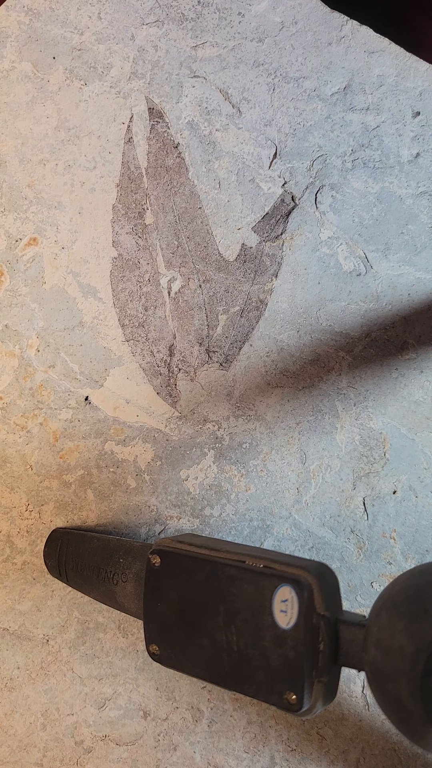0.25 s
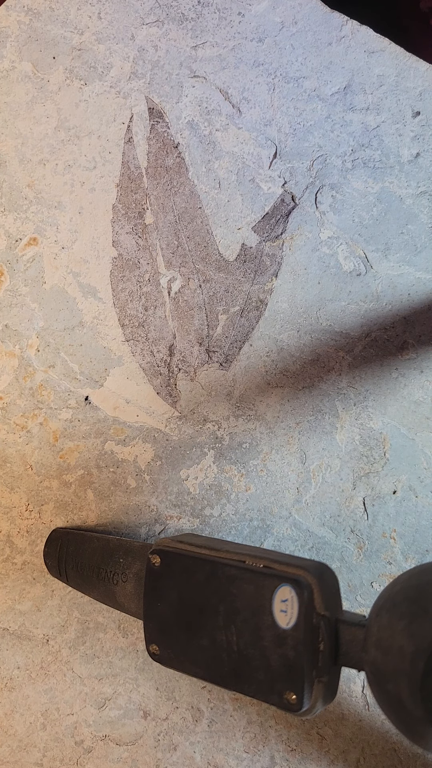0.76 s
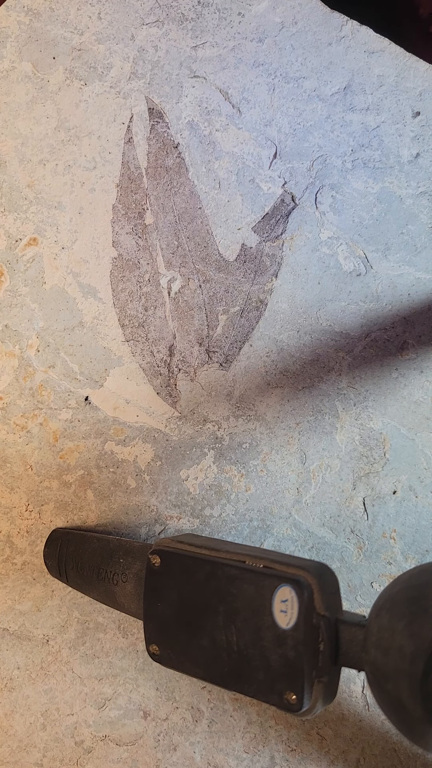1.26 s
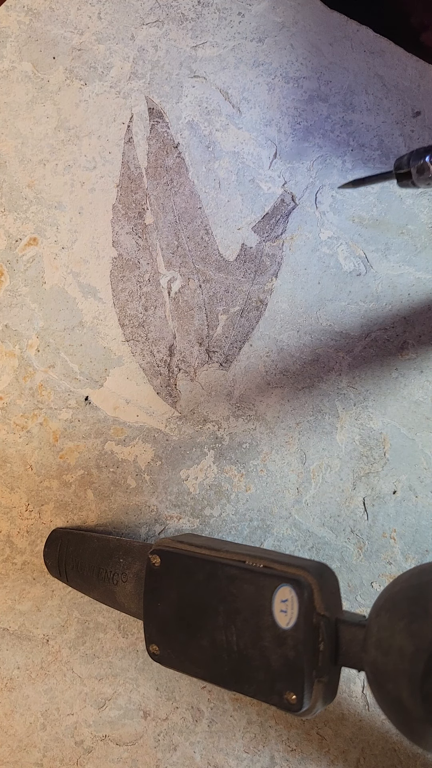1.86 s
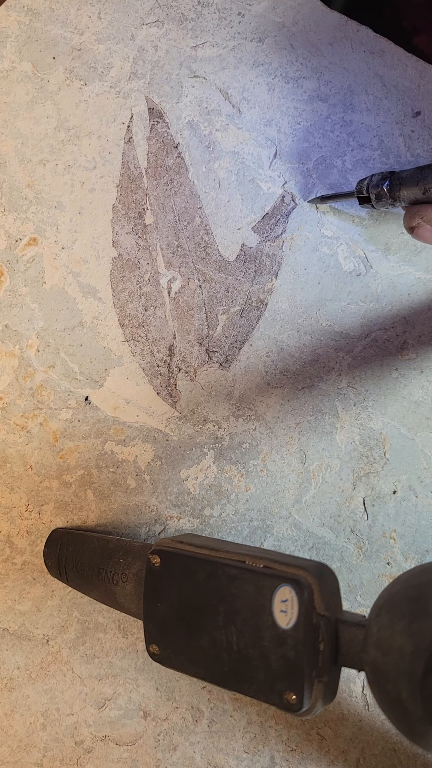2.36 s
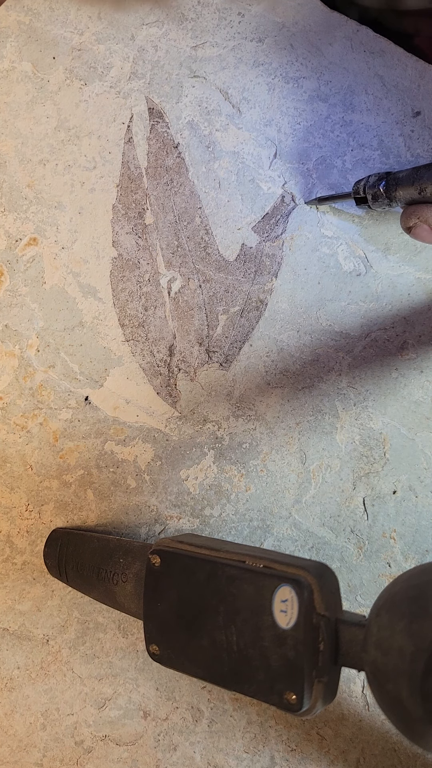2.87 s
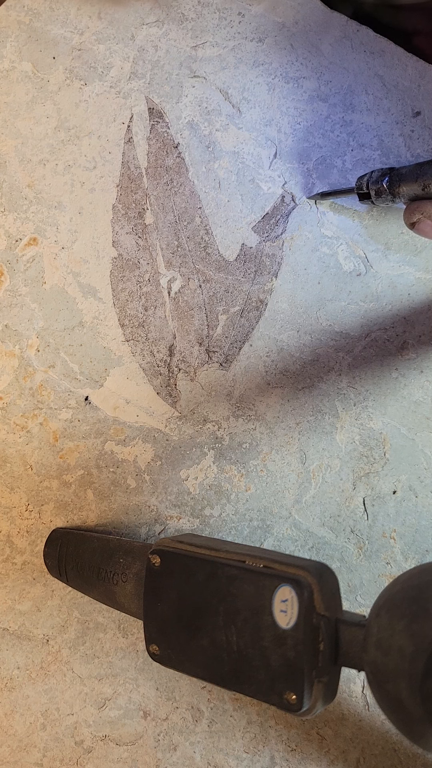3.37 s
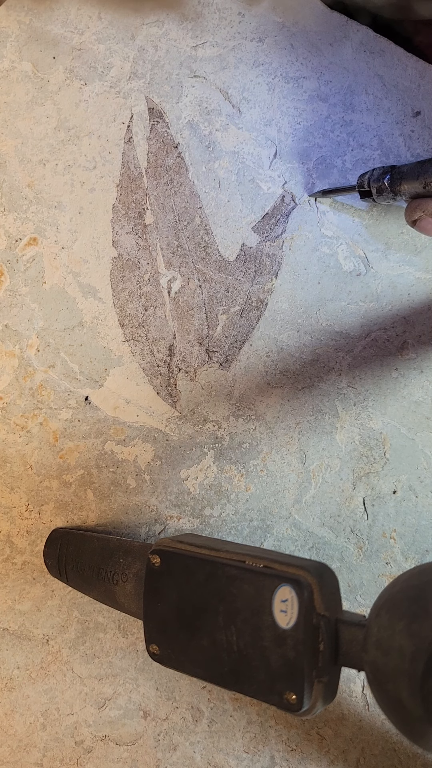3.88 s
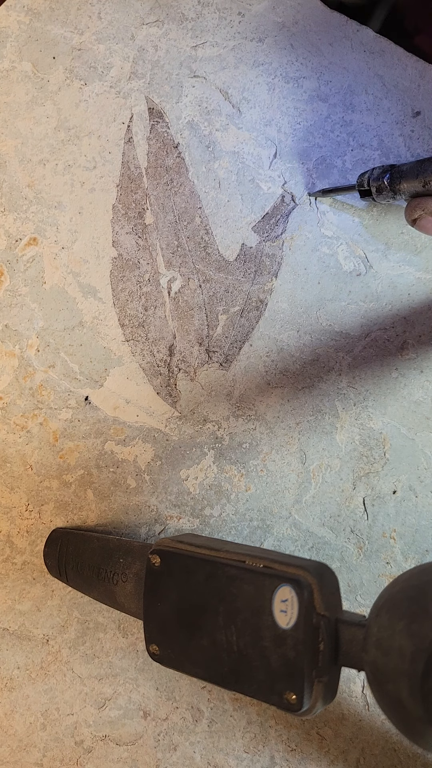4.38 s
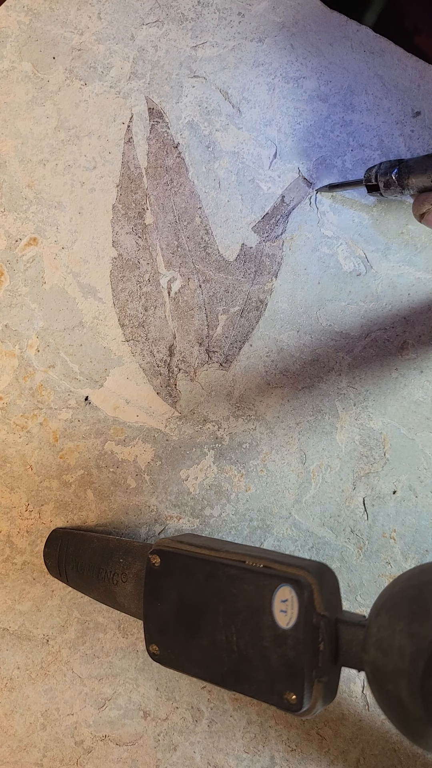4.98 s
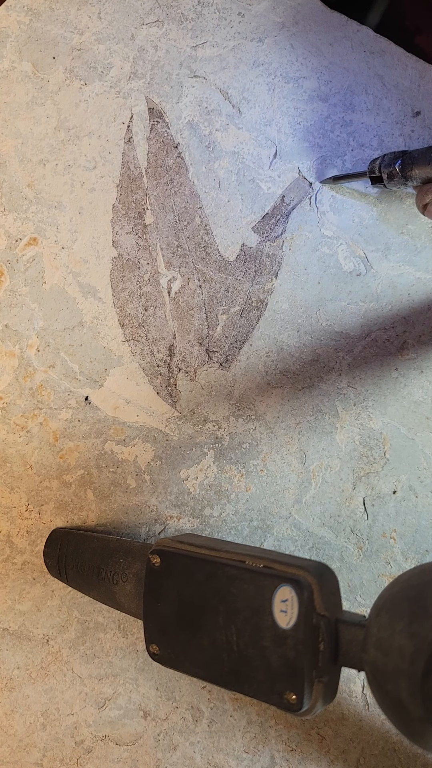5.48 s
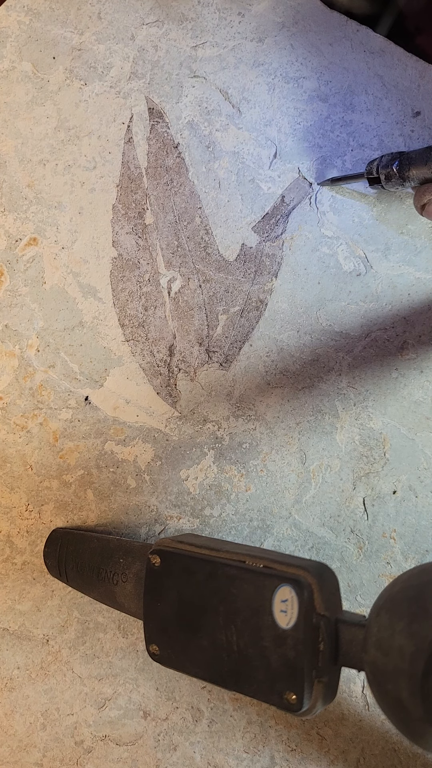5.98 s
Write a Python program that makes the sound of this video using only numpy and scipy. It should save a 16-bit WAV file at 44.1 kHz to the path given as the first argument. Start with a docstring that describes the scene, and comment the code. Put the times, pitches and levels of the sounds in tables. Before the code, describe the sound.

Small air-driven scribe buzzes softly, leaps in pitch within a moment, then drones on steadily with harsh compressed-air hiss over stone.

```python
"""Pneumatic scribe on a stone slab

A scribe idles in a quiet workshop; its valve opens and the piston races up to full speed.
The hand swings it past two spaced microphones and lowers it onto the slab. The buzz is a sum of stroke
overtones; the exhaust is shaped noise puffing once a stroke. Low rumble, tones and soft bumps lie behind."""
import sys
import numpy as np
from scipy import signal
from scipy.fft import rfft, irfft, next_fast_len
from scipy.io import wavfile
from scipy.ndimage import uniform_filter1d, map_coordinates

SR = 44100
rng = np.random.default_rng(int(sys.argv[2]) if len(sys.argv) > 2 else 0)


def store_wav(level_fs):
    """Save 16-bit WAV to argv[1]."""
    pcm = np.round(np.clip(np.atleast_2d(level_fs), -1, 1) * 32767)
    wavfile.write(sys.argv[1], SR, pcm.T.astype(np.int16))


N = 275184
TIME = np.arange(N) / SR

# changes from one hold of the tool to the next: start_s, end_s
MOVES = [(.63, .68), (.7, .76), (.93, 1.0), (1.33, 1.42), (1.76, 1.9), (5.62, 5.76)]


def amp(db):
    """Gain of a level in dB."""
    return 10 ** (np.asarray(db) / 20)


def unit(x):
    """Scaled to rms 1."""
    return x / np.sqrt(np.mean(x ** 2))


def along(points, hz):
    """(Hz, value) points interpolated on a log frequency axis."""
    point_hz, value = np.transpose(points)
    return np.interp(np.log(hz + 1), np.log(point_hz + 1), value)


def curves(rows):
    """One value per sample for each column after the time."""
    s, *columns = np.transpose(rows)
    return [np.interp(TIME, s, column) for column in columns]


def wobble(knots_per_s):
    """A smooth random curve through normally distributed knots."""
    coarse_s = TIME[::16]
    knots = rng.standard_normal(int(N * knots_per_s / SR) + 4)
    return np.interp(TIME, coarse_s, map_coordinates(knots, [coarse_s * knots_per_s]))


def filtered(x, response):
    """x with its spectrum multiplied by a response of frequency."""
    m = next_fast_len(N + SR // 2)
    return irfft(rfft(x, m) * response(np.fft.rfftfreq(m, 1 / SR)), m)[..., :N]


def bands(hz, table):
    """Gain of narrow lifts or dips given as (centre Hz, width Hz, dB)."""
    return amp(sum(db / (1 + (2 * (hz - centre_hz) / width_hz) ** 2) for centre_hz, width_hz, db in table))


def pair(alike):
    """Two partly alike white noises, with small time-frequency patches of chance gain."""
    spectra = signal.stft(rng.standard_normal((2, N)), nperseg=512)[2]
    patches = uniform_filter1d(rng.standard_normal(spectra.shape[1:]), size=4, axis=0)
    patches = uniform_filter1d(patches, size=8, axis=1)
    a, b = signal.istft(spectra * amp(1.4 * unit(patches)), nperseg=512)[1][:, :N]
    turn = np.arccos(np.clip(alike, -1, 1)) / 2
    common, differing = np.cos(turn) * a, np.sin(turn) * b
    return np.array([common + differing, common - differing])


def piston():
    """Phase of the stroke cycle: the rate races from idle to full speed, stumbling, and stays unsteady."""
    # full speed, pulled about by the hand and the load on the tip: time_s, strokes_per_s
    full_speed = [(.76, 252), (.95, 252.6), (.99, 249.9), (1.28, 251), (1.38, 249.4), (1.44, 251.4),
                  (1.52, 247.6), (1.78, 251.6), (1.815, 253), (1.843, 259), (1.865, 252.5), (2.1, 251.8),
                  (3.4, 251.6), (4.0, 250.3), (4.76, 250.5), (4.9, 248.6), (4.98, 251.4), (5.44, 250.4),
                  (5.64, 251.7), (5.76, 248.8), (6.24, 249.3)]
    idle_hz, race_middle_s = 157.5, .677
    spin_up_s, settle_s = .016, .021  # time constants before and after the middle
    jitter, stumble = 0.0026, 0.007  # shares of the rate; stumble acts during the race

    full_hz, = curves(full_speed)
    time_constant_s = np.where(TIME < race_middle_s, spin_up_s, settle_s)
    opened = 1 / (1 + np.exp((race_middle_s - TIME) / time_constant_s))
    racing = 4 * opened * (1 - opened)
    unsteady = 0.001525 * wobble(25) + (jitter + stumble * racing) * wobble(120)
    stroke_hz = (idle_hz + (full_hz - idle_hz) * opened) * (1 + unsteady)
    return 2 * np.pi * np.cumsum(stroke_hz) / SR


def buzz(cycle):
    """Stroke overtones; each hold of the tool radiates them differently to the two sides."""
    # overtones of each hold: multiple, left_db, right_db, left_lead_rad
    idling = [(1, -36.0, -36.0, 1.0), (2, -30.0, -36.0, 0.4), (3, -29.0, -34.0, 2.3),
              (4, -29.0, -48.0, 1.9), (5, -38.0, -41.0, -1.7), (6, -34.0, -52.0, -2.2),
              (7, -42.0, -45.0, -2.6), (8, -36.0, -40.0, 2.1), (9, -37.0, -36.0, -3.0),
              (10, -45.0, -49.0, 2.3), (11, -42.0, -42.0, 2.9), (12, -40.0, -38.0, -2.6),
              (13, -38.0, -42.0, -1.5), (14, -46.0, -51.0, -1.5), (15, -69.0, -66.0, -2.3),
              (16, -49.0, -46.0, 0.0), (17, -45.0, -48.0, 0.9), (18, -50.0, -54.0, -0.3),
              (19, -52.0, -56.0, 2.4), (20, -46.0, -54.0, -0.8), (21, -44.0, -51.0, 1.8),
              (22, -42.0, -51.0, 1.7), (23, -48.0, -55.0, 2.7), (24, -52.0, -53.0, 3.0),
              (25, -49.0, -53.0, 0.1), (26, -49.0, -51.0, 2.9), (27, -52.0, -51.0, -2.8),
              (28, -53.0, -60.0, -2.8), (29, -54.0, -55.0, -2.1), (30, -52.0, -50.0, -2.6),
              (31, -52.0, -54.0, -2.8), (32, -50.0, -54.0, -0.9), (33, -54.0, -59.0, -0.9),
              (34, -54.0, -56.0, -0.7), (35, -52.0, -60.0, 0.3), (36, -55.0, -61.0, -1.8),
              (37, -52.0, -60.0, -0.3), (38, -52.0, -59.0, 0.0), (39, -55.0, -62.0, -2.3),
              (40, -54.0, -57.0, 1.4), (41, -56.0, -68.0, 2.0), (42, -54.0, -62.0, 1.1),
              (43, -56.0, -61.0, -1.4), (44, -54.0, -58.0, -1.8)]
    racing = [(1, -26, -36, 4), (2, -19, -26, 4), (3, -27, -33, 3), (4, -32, -32.5, 2), (5, -43, -61, -2.5),
              (6, -51, -37, 6), (7, -41, -32, -4), (8, -31, -34, 5), (9, -40, -35, -10.5)]
    lifted = [(1, -18.0, -29.0, -0.0), (2, -21.0, -24.0, 2.8), (3, -44.0, -26.0, -2.4),
              (4, -37.0, -27.0, -2.9), (5, -34.0, -36.0, 3.1), (6, -35.0, -34.0, -0.6),
              (7, -34.0, -24.0, -1.9), (8, -57.0, -32.0, 0.2), (9, -45.0, -46.0, -0.5),
              (10, -43.0, -53.0, -1.0), (11, -37.0, -42.0, -1.4), (12, -37.0, -33.0, 1.2),
              (13, -36.0, -37.0, -0.4), (14, -43.0, -43.0, 1.1), (15, -36.0, -36.0, 2.3),
              (16, -37.0, -42.0, 1.2), (17, -44.0, -44.0, -1.5), (18, -45.0, -47.0, 3.0),
              (19, -50.0, -60.0, -2.8), (20, -44.0, -44.0, -1.6), (21, -43.0, -50.0, 0.1),
              (22, -47.0, -52.0, -0.3), (23, -41.0, -45.0, 0.2), (24, -46.0, -45.0, 0.1)]
    swung = [(1, -20.0, -30.0, -0.2), (2, -26.0, -24.0, 2.5), (3, -31.0, -36.0, 2.3),
             (4, -30.0, -37.0, 1.6), (5, -41.0, -43.0, 2.6), (6, -37.0, -38.0, 2.0),
             (7, -31.0, -32.0, -2.8), (8, -27.0, -26.0, -2.5), (9, -39.0, -40.0, -2.0),
             (10, -56.0, -40.0, -1.7), (11, -31.0, -34.0, 2.7), (12, -30.0, -35.0, -0.7),
             (13, -40.0, -39.0, -2.0), (14, -40.0, -49.0, -0.2), (15, -38.0, -37.0, 1.1),
             (16, -39.0, -44.0, -1.8), (17, -45.0, -56.0, 0.3), (18, -57.0, -59.0, -2.9),
             (19, -57.0, -55.0, 2.5), (20, -47.0, -48.0, -2.4), (21, -47.0, -48.0, -1.4),
             (22, -54.0, -57.0, -0.8), (23, -53.0, -56.0, -0.1), (24, -54.0, -58.0, 0.1)]
    lowered = [(1, -19.0, -26.0, 0.6), (2, -27.0, -24.0, 1.9), (3, -25.0, -26.0, 0.7),
               (4, -18.0, -22.0, 2.4), (5, -33.0, -38.0, 3.0), (6, -36.0, -35.0, -2.6),
               (7, -31.0, -40.0, 2.2), (8, -41.0, -49.0, -2.7), (9, -44.0, -45.0, 3.0),
               (10, -51.0, -50.0, -1.9), (11, -38.0, -39.0, -3.0), (12, -37.0, -37.0, -3.1),
               (13, -40.0, -40.0, -2.4), (14, -49.0, -48.0, 0.4), (15, -44.0, -44.0, -0.5),
               (16, -39.0, -39.0, -0.2), (17, -46.0, -48.0, -0.1), (18, -53.0, -51.0, 0.2),
               (19, -47.0, -55.0, 2.2), (20, -48.0, -55.0, -2.2), (21, -44.0, -49.0, 0.4),
               (22, -47.0, -50.0, 1.4), (23, -58.0, -56.0, 2.6), (24, -60.0, -62.0, -0.5),
               (25, -57.0, -62.0, -3.0), (26, -55.0, -59.0, -1.3)]
    working = [(1, -21.0, -28.0, 0.6), (2, -27.0, -26.0, 1.8), (3, -25.0, -26.0, 0.8),
               (4, -18.0, -26.0, 2.4), (5, -30.0, -42.0, 2.1), (6, -33.0, -39.0, -1.8),
               (7, -26.0, -31.0, 2.6), (8, -36.0, -42.0, -2.6), (9, -43.0, -45.0, -2.3),
               (10, -50.0, -50.0, -3.1), (11, -45.0, -43.0, -2.1), (12, -41.0, -38.0, -2.1),
               (13, -46.0, -37.0, -1.7), (14, -43.0, -47.0, -2.9), (15, -48.0, -44.0, -3.1),
               (16, -52.0, -41.0, -1.8), (17, -43.0, -42.0, -1.4), (18, -50.0, -48.0, -0.3),
               (19, -47.0, -49.0, 0.2), (20, -47.0, -49.0, 0.5), (21, -48.0, -54.0, 1.2),
               (22, -45.0, -55.0, 1.8), (23, -47.0, -55.0, 1.9), (24, -53.0, -55.0, -3.1),
               (25, -48.0, -54.0, -1.4), (26, -52.0, -52.0, -2.4), (27, -58.0, -52.0, 3.1),
               (28, -45.0, -60.0, 2.8), (29, -48.0, -51.0, -1.6), (30, -51.0, -59.0, 1.6)]
    tilted = [(1, -22.0, -30.0, 0.8), (2, -27.0, -26.0, 1.7), (3, -26.0, -27.0, 0.5),
              (4, -18.0, -25.0, 2.6), (5, -27.0, -36.0, 0.1), (6, -31.0, -30.0, -2.0),
              (7, -26.0, -32.0, 2.6), (8, -37.0, -33.0, -2.9), (9, -41.0, -41.0, -3.1),
              (10, -48.0, -48.0, -3.0), (11, -44.0, -43.0, 0.2), (12, -39.0, -39.0, 3.1),
              (13, -43.0, -42.0, -1.7), (14, -39.0, -42.0, -2.5), (15, -47.0, -43.0, -2.5),
              (16, -42.0, -34.0, -0.3), (17, -36.0, -35.0, -1.7), (18, -60.0, -40.0, -1.4),
              (19, -50.0, -41.0, -2.1), (20, -43.0, -40.0, 1.0), (21, -47.0, -47.0, 2.4),
              (22, -35.0, -45.0, 1.8), (23, -38.0, -48.0, 1.2), (24, -46.0, -47.0, -1.8),
              (25, -41.0, -42.0, -2.1), (26, -47.0, -47.0, -3.0), (27, -44.0, -46.0, 3.1),
              (28, -35.0, -45.0, -3.0), (29, -41.0, -49.0, -2.4), (30, -42.0, -57.0, -0.1)]
    # fifth overtone swells and dulls during the work: time_s, gain_db
    fifth = [(2.4, -1.5), (4.2, 3), (4.9, 0.5), (5.2, -8)]
    # overtones of a puff do not peak together: rad_per_multiple_squared, rad_per_multiple, rad
    slow_puff, fast_puff = (-1.0, 1.42, -.36), (.22, -.16, -.36)
    rasp_top, rasp_db, rasp_scatter_db = 63, (-53, -60), 2.5  # top multiple, left and right dB
    uneven_db, uneven_per_s = 0.82, 36
    swing_wander_db, swing_wander_per_s = 3, 9.18

    moved = [np.ones(N)] + [np.interp(TIME, move, [0, 1]) for move in MOVES] + [np.zeros(N)]
    # the idling ladder goes on faintly
    rasp = [(k, *rng.normal(rasp_db, rasp_scatter_db), rng.uniform(-np.pi, np.pi))
            for k in range(len(idling) + 1, rasp_top + 1)]
    holds = (idling + rasp, racing, lifted, swung, lowered, working, tilted)
    swinging, at_work = moved[2] - moved[4], moved[5] - moved[6]
    uneven = amp(uneven_db * wobble(uneven_per_s))  # harder and softer strokes, in quick runs
    out = np.zeros((2, N))
    for k in range(1, max(map(len, holds)) + 1):
        gain, leading = np.zeros((2, N)), np.zeros(N)
        for hold, comes, goes in zip(holds, moved, moved[1:]):
            if k <= len(hold):
                _, left_db, right_db, lead_rad = hold[k - 1]
                gain += np.outer(amp([left_db, right_db]), comes - goes)
                leading += lead_rad * (comes - goes)
        if k == 5:
            gain *= amp(curves(fifth)[0] * at_work)
        if k > 1:
            gain *= uneven
        # random wavering of strength and phase, greater in higher overtones
        drift_db = (.1 + .002 * min(k, 24) ** 2) * wobble(2.5)
        drift_db += swing_wander_db * min(k / 6, 1) * swinging * wobble(swing_wander_per_s)
        level_waver = [amp(drift_db + (0.13 + 0.15 * min(k, 24)) * wobble(30)) for side in range(2)]
        phase_waver = [0.041 * min(k, 30) * wobble(22) for side in range(2)]
        slow, fast = (np.polyval(puff, k) % (2 * np.pi) for puff in (slow_puff, fast_puff))
        spread = slow + (fast - slow) * moved[1]
        phase = k * cycle + spread + phase_waver + np.outer([.5, -.5], leading)
        out += gain * level_waver * np.cos(phase)
    return np.sqrt(2) * out  # table levels are rms


def exhaust(cycle):
    """Turbulent air in four ranges, pulsing once a stroke, most ranges deeper on the left."""
    # open exhaust while the vent swings, then on the slab: time_s, jet_db, hiss_db, flutter_db, whoosh_db
    open_air = [(.7, -16.5, -27.5, -25, -35.5), (.85, -18, -33, -29, -46), (.92, -17, -39, -32, -46),
                (.97, -13, -31, -29, -43), (1.0, -21, -34, -26.5, -36), (1.09, -22.5, -32, -29.5, -35),
                (1.14, -18.5, -32.5, -26, -44), (1.24, -18.5, -27.5, -25, -47), (1.33, -18, -34, -34, -37),
                (1.38, -18, -29, -25, -43), (1.44, -19, -32.5, -32, -33.5), (1.48, -18, -32, -33, -36),
                (1.54, -17.5, -31.5, -32, -46), (1.62, -17, -29, -43, -38), (1.8, -20, -33, -40, -45),
                (2.1, -20, -32.5, -36, -46), (5.62, -20, -31, -36.5, -44), (5.76, -20.5, -32, -41, -46.5)]
    # valve nearly shut: jet_db, hiss_db, flutter_db, whoosh_db
    idle_air = (-28, -40.5, -43, -51.5)
    # flow rises to full before the piston does: start_s, end_s
    air_opens = (0.638, 0.685)
    # spectrum shapes: freq_hz, relative_density_db
    jet = [(5590, -35), (9500, -5), (10800, -5), (12100, 1), (13100, 4), (14300, 2.5), (15100, 5.5),
           (15700, -4.5)]
    hiss = [(2240, -46), (3800, -6.5), (4470, -4), (5280, -3), (6300, -2.5), (6750, -1), (7300, 1),
            (8300, -2), (9290, -10.5), (10800, -23), (11500, -17), (15000, -55), (22000, -120)]
    flutter = [(1100, -17), (1600, -7.5), (2000, 0.5), (2500, -2.5), (3000, -1), (3400, 2.5), (4000, -6),
               (5000, -9.5), (6200, 1.5), (7500, -15)]
    whoosh = [(110, -35), (160, -13), (250, 9.5), (400, -6), (620, -8.5), (900, -3), (1300, 1),
              (1700, -5.5), (2300, -24), (3000, -48)]
    # steady whistling bands of the vent: centre_hz, width_hz, lift_db
    nozzle = [(7430, 300, 4), (12300, 150, 5), (13750, 250, 3), (14300, 200, 3), (14700, 250, 4),
              (15330, 300, 5)]
    # difference between the sides: freq_hz, left_minus_right_db
    sides = [(140, 3), (330, 8), (600, 20), (1170, 6), (1790, 3), (2740, -4.5), (4190, -2), (6410, 2),
             (8300, -1), (9810, 1.5), (12300, -7), (15000, -7.5)]
    # left minus right on top of that: idling_db, swinging_db, working_db
    vent_pan = (2.5, 3, 2.6)
    # stroke puff, rows idling, swinging, working: depth_factor, delay_rad, sharpness_0_to_1
    puff_shapes = [(1.2, 0.89, 0.7), (0.66, 1.6, .2), (0.93, 0.24, 0.36)]
    # colour with the valve nearly shut: freq_hz, gain_db
    trickle = [(1500, 1), (2450, 3.5), (3300, 1), (4400, -6), (6000, -1), (7800, 0), (10000, -1),
               (15000, 0.5)]
    # narrow dips in the air noise while working: centre_hz, width_hz, gain_db
    dips = [(2180, 160, -14), (2530, 88, -19), (2430, 130, -16.5), (3600, 110, -15)]

    def by_use(values):
        """Glide from the idling to the swinging to the working value."""
        return np.interp(TIME, [*MOVES[0], *MOVES[3]], np.repeat(values, [1, 2, 1]))

    def paths(hz, lag_ms):
        """Level difference of the sides and lag of the right one."""
        lag = np.exp(np.outer([0, -2j * np.pi * lag_ms / 1000], hz))
        return amp(np.outer([.5, -.5], along(sides, hz))) * lag

    flow = np.interp(TIME, air_opens, [0, 1])
    levels_db = [idle + (full - idle) * flow for idle, full in zip(idle_air, curves(open_air))]
    depth, delay, sharp = (by_use(column) for column in np.transpose(puff_shapes))
    pulse = depth * (np.cos(cycle - delay) + sharp * np.cos(2 * (cycle - delay)))
    # spectrum, left and right dB per unit of pulse, left-right likeness, lag_ms
    ranges = [(jet, [[2.7], [1.3]], .4, .267), (hiss, [[2.6], [.8]], .4, .235),
              (flutter, [[2.2], [1.2]], .4, .235), (whoosh, [[1.2], [1.3]], .45, .235)]
    out = np.zeros((2, N))
    for (spectrum, pulse_db, alike, lag_ms), level_db in zip(ranges, levels_db):
        puffs = pair(alike) * amp(pulse_db * pulse)
        air = filtered(puffs, lambda hz: amp(along(spectrum, hz)) * bands(hz, nozzle) * paths(hz, lag_ms))
        air /= np.std(air.mean(axis=0))  # referred to the two sides mixed
        out += amp(level_db + 0.31 * wobble(9.5) + 0.53 * wobble(25)) * air
    out = flow * out + (1 - flow) * filtered(out, lambda hz: amp(along(trickle, hz)))
    dipped = np.interp(TIME, [MOVES[3][1], 1.6], [0, 1])
    out = (1 - dipped) * out + dipped * filtered(out, lambda hz: bands(hz, dips))
    return out * amp(np.outer([.5, -.5], by_use(vent_pan)))


def shop():
    """Building rumble and wavering tones as ebbing filtered noise; the touchdown knock and bench bumps as
    decaying sines."""
    # rumble shape: freq_hz, relative_density_db
    rumble = [(22, -28), (33, 0.5), (48, -2), (76, -5.5), (108, 1), (129, -2), (150, -10), (200, -4.5),
              (330, -120)]
    # wavering low tones: centre_hz, width_hz, level_before_ebb_db
    drone = [(36.8, 2.2, -47), (54.5, 1.7, -49), (70.7, 2.3, -49.5), (106.8, 2.7, -48.5)]
    # the knock of the tool touching down on the slab (first row), then soft bumps on the bench: start_s,
    # onset_db, pitch_hz
    thumps = [(1.477, -20, 400), (1.51, -30, 110), (1.569, -31, 120), (1.478, -25, 94.2),
              (2.729, -19, 51.1), (4.299, -26, 78.1), (4.858, -22.5, 48.4)]
    start_gain_db, ebb_db_per_s = 0.9, 0.74

    out = amp(-44.5) * unit(filtered(pair(0.88), lambda hz: amp(along(rumble, hz))))
    for tone_hz, width_hz, db in drone:
        tone = filtered(pair(0.81), lambda hz: 1 / (1 + ((hz - tone_hz) / width_hz * 2) ** 2))
        out += amp(db) * unit(tone)
    out *= amp(start_gain_db - ebb_db_per_s * TIME)
    for start_s, onset_db, pitch_hz in thumps:
        t = np.maximum(TIME - start_s, 0)
        out += amp(onset_db - 60 * t / 0.044) * np.sin(2 * np.pi * pitch_hz * t)  # 60 dB down in 44 ms
    return out


def scene():
    """The scribe and its workshop; buzz and exhaust share one stroke cycle."""
    cycle = piston()
    return buzz(cycle) + exhaust(cycle) + shop()


def record(dry):
    """Round off the highest peaks, then cut everything above the band limit."""
    top_hz = 15750
    rounded = dry / (1 + np.abs(dry / 1.05) ** 8) ** (1 / 8)
    return filtered(rounded, lambda hz: hz < top_hz)


dry = scene()
out = record(dry)
store_wav(out)
```